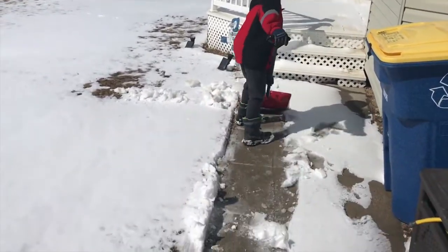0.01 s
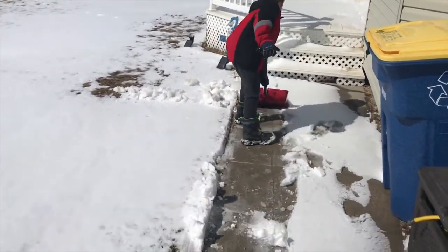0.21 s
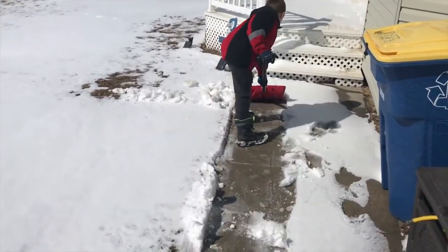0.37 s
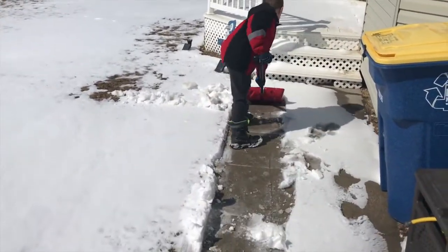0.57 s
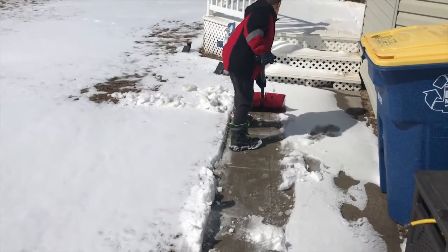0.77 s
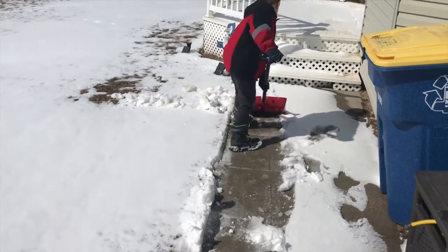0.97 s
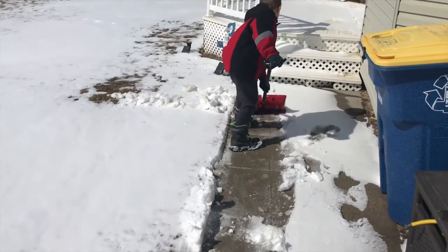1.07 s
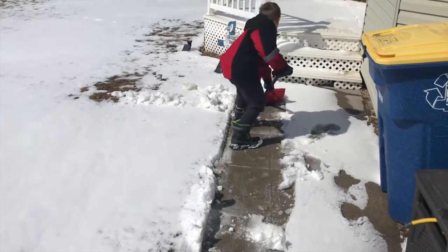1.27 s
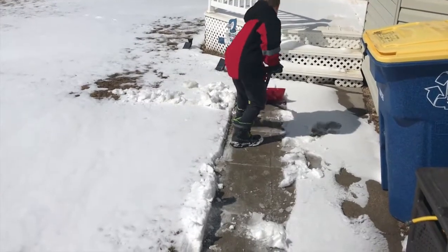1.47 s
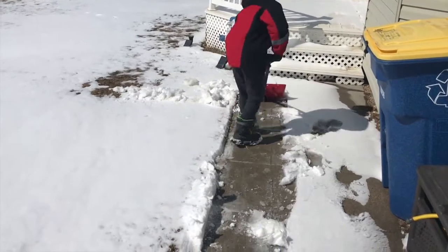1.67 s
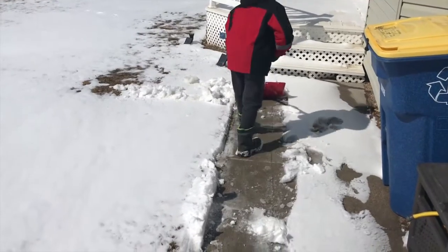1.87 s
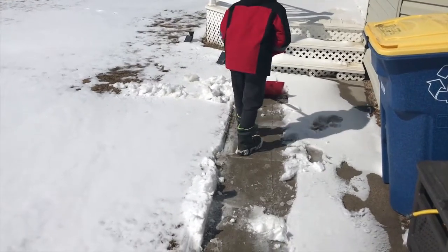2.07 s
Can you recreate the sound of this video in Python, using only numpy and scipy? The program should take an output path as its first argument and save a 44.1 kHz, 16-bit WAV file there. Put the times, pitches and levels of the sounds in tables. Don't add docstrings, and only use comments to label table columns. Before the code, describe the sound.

A plastic snow shovel grates loudly over wet gritty concrete with hollow knocks, drags back lightly with a snap, scrapes again, then fades to faint boot shuffles and low wind thumps on a phone microphone outdoors.

```python
import sys
import numpy as np
from scipy import signal
from scipy.fft import rfft, irfft
from scipy.io import wavfile
from scipy.ndimage import uniform_filter1d

SR = 44100
rng = np.random.default_rng(int(sys.argv[2]) if len(sys.argv) > 2 else 0)


def wav_record(signal):
    frames = np.transpose(np.atleast_2d(signal))
    bounded = np.clip(frames, -1, 1)
    quanta = np.round(bounded * 32767).astype(np.int16)
    wavfile.write(sys.argv[1], SR, quanta)


def to_linear_factor(level_db):
    exponent = np.asarray(level_db, float) / 20
    return 10 ** exponent


N = 94815

# time in seconds, sliding level in dB, load on the blade in dB.
LIFT = [(0, -50.5, 0.5), (.03, -53.5, 3.5), (.085, -58, 4), (.14, -72.5, -20)]
FIRST_PUSH = [(0.155, -49.5, 0), (0.162, -46.5, 0), (.21, -38.5, 0), (0.261, -30.5, 0), (0.302, -38, 0),
              (0.313, -28.5, 0), (0.338, -34.5, 0), (0.353, -30.5, 0), (0.428, -41.5, 0)]
SLIDE_OFF = [(.448, -51.5, -26.5), (.48, -47, -23), (.56, -51, -34), (0.609, -56, -17), (.72, -54, -2)]
DRAG_BACK = [(0.761, -46.5, 2), (.79, -50.5, 3), (0.838, -47, 0), (0.874, -51.5, -5.5), (0.9, -43.5, 2),
             (0.926, -59, 6.5), (0.942, -42.5, 4.5), (1.013, -49.5, 0), (1.074, -72, -2)]
SECOND_PUSH = [(1.09, -48.5, -0.5), (1.108, -48, 0), (1.127, -33, 5), (1.147, -32.5, -4.5),
               (1.16, -38.5, 5.5), (1.222, -37.5, -1.5), (1.233, -30.5, -3), (1.267, -46.5, -1),
               (1.324, -41.5, -1)]
BOOT_STEPS = [
    [(1.35, -56, -8.5), (1.39, -59.5, -23), (1.5, -54, -13), (1.58, -60.5, -10), (1.63, -53.5, -26),
     (1.672, -63, -24), (1.692, -42, -8.5), (1.71, -47.5, -0.5), (1.735, -55, -2)],
    [(1.76, -53.5, -18.5), (1.82, -61.5, -21), (1.85, -68, -22), (1.864, -46.5, -11), (1.885, -46.5, -13),
     (1.905, -47.5, -31), (1.95, -58.5, -4), (2.05, -65.5, 4), (2.15, -56, -4)],
]
# start in seconds, edge level in dB,
# scoop in dB above the edge, crack in dB above the edge, scoop pitch in Hz.
KNOCKS = [(0.028, -50, -22, 6, 338), (0.177, -32, -7, 0, 282), (.209, -20, -9.5, -20, 400),
          (0.233, -21.5, -2.5, -29, 305), (0.2503, -12, -0.5, -1.5, 275), (0.268, -18, -9.5, -32.5, 316),
          (.278, -21.5, 4.5, -20, 237), (0.3178, -11, 0, -25, 350), (.354, -19, 0, -9, 300),
          (0.487, -47, 10.5, 2, 285), (0.764, -29, -2.5, -14, 423), (0.895, -37, 0, -16, 350),
          (0.946, -21, -12.5, -18, 360), (1.001, -27, -2.5, -3, 341), (1.120, -21.5, 4, -15, 363),
          (1.133, -15, -10, -28, 364), (1.146, -15, 7, -30, 315), (1.1676, -20.5, -18, -4.5, 340),
          (1.198, -23, -2, -7, 378), (1.225, -26, -1, -23, 400), (1.298, -30, -6, -10, 361),
          (1.604, -43, -4, 0, 250)]
# frequency in Hz, level in dB, t60 in seconds.
SCOOP_MODES = [(250, -6, 0.087), (326, -0.5, 0.073), (400, 7, 0.024)]
EDGE_MODES = [(519, -9.5, 0.088), (606.7, 1, 0.068), (716.5, 1, 0.054), (902, -3, 0.081),
              (990.6, -2, 0.088), (1100, -0.5, 0.038), (1361, 1, 0.034), (1588, -1, 0.048),
              (1846, 4, 0.014), (1937, 4, 0.013), (2350, -10.5, 0.053), (3402, -10, 0.029)]
# frequency in Hz, level in dB per Hz.
SLUSH_SPECTRUM = [(300, -37), (700, -6), (1500, -2.5), (2200, -3.5), (4000, -12), (8000, -14), (16000, -21)]
# start in seconds, peak in dB, frequency in Hz, fade in seconds.
PUFFS = [(0.014, -42, 60.6, 0.025), (0.081, -36.5, 61, 0.019), (0.732, -38, 58, 0.011),
         (0.799, -28, 105, 0.0094), (0.814, -30, 54, 0.013), (0.889, -27, 76, 0.016),
         (1.019, -37.5, 76.5, 0.028), (1.326, -31, 71, 0.0085), (1.353, -28, 67.4, 0.023),
         (1.585, -30, 71.6, 0.043), (1.6, -24, 102, 0.01), (1.685, -35, 69, 0.02), (1.726, -32, 69.6, 0.03),
         (1.752, -31, 55, 0.013), (1.783, -38, 70, 0.025), (1.815, -20.5, 72.6, 0.014),
         (1.828, -19.5, 61, 0.034), (1.924, -28.5, 76.6, 0.0097), (2.031, -56, 72.4, .013),
         (2.094, -29, 57, 0.024)]
# frequency in Hz, level in dB per Hz.
WIND_SPECTRUM = [(20, -40), (50, 7), (80, -12), (150, -9), (250, -22), (600, -51)]
FLOOR_SPECTRUM = [(150, -3.5), (400, 5.5), (1700, -5.5), (2600, -23), (6000, -21.5), (16000, -30)]
# frequency in Hz, level in dB, t60 in seconds.
JOINT_MODES = [(996, 2, 0.035), (1330, -4, 0.024), (1540, -7.5, 0.029), (2055, 1.5, 0.027),
               (2440, -11, 0.019), (2970, -7, 0.02), (3600, -15.5, .01), (6930, -2, 0.0038)]
# centre in seconds, half-length in seconds, level in dB, frequency in Hz, t60 in seconds.
RUBS = [
    (0.474, 0.016, -47.5, 1930, 0.0074),
    (0.835, .06, -62, 12800, .002),
    (.905, 0.023, -64, 6750, .003),
    (1.6, 0.081, -60, 12400, 0.00074),
    (1.83, 0.024, -57.5, 12900, 0.00045),
    (1.986, 0.01, -59, 3330, 0.0029),
    (2.137, 0.024, -62, 3350, 0.0037),
]
# frequency in Hz, level in dB.
MIC_RESPONSE = [(2200, -1.5), (2700, -2.5), (3500, 3), (5000, 0.5), (6300, 3.5), (9000, 1), (12500, 4.5),
                (15000, 1.5)]
# start in seconds, peak in dB, frequency in Hz, fade in seconds.
PEBBLES = [(.161, -36, 990, 0.003), (.166, -42, 1320, .004), (.178, -33, 1620, .004),
           (.206, -25.5, 1647, 0.014), (.2105, -35, 4850, 0.0027), (.229, -47, 6300, 0.0025),
           (0.2523, -17, 4430, 0.0014), (.253, -15.5, 2400, 0.0041), (.257, -29, 6500, 0.0036),
           (.269, -20, 1420, 0.0058), (.314, -31, 5330, 0.0051), (.315, -30, 6170, 0.0056),
           (.3175, -19, 688, 0.011), (.317, -20.5, 2044, 0.0066), (.348, -34, 6100, 0.0056),
           (.348, -25, 2260, 0.0047), (.355, -33, 4440, 0.0074), (.369, -28, 2090, 0.0039),
           (.378, -37, 3490, 0.0054), (.386, -43, 650, 0.0064), (.411, -36, 1330, 0.0045),
           (.428, -41, 1010, 0.0055), (.634, -39, 1470, 0.0017), (.969, -26, 1100, .004),
           (.97, -28, 2050, 0.0035), (1.088, -42, 970, 0.0035), (1.1175, -34.5, 3350, .004),
           (1.12, -23, 763, 0.011), (1.1325, -13.5, 1537, 0.0026), (1.1325, -28, 6350, 0.0024),
           (1.175, -41, 730, .012), (1.142, -27, 6020, 0.0043), (1.142, -22.5, 3280, 0.0024),
           (1.143, -12.5, 1775, 0.0028), (1.147, -21, 735, .012), (1.1676, -24.5, 2440, 0.0034),
           (1.1986, -34, 4060, .004), (1.2, -24.5, 2050, 0.0031), (1.203, -37, 6300, 0.0036),
           (1.297, -31, 918, 0.005), (1.299, -35, 1300, 0.0041), (1.605, -36, 1280, 0.0037),
           (1.604, -40, 3220, 0.00094), (.252, -21, 687, .008)]


def level(x, db):
    return x * to_linear_factor(db) / np.sqrt(np.mean(x ** 2))


def through(x, response):
    return signal.fftconvolve(x, response / np.sqrt(np.sum(response ** 2)))[:N]


def colour(x, points):
    p, size = np.array(points, float), 8192
    hz = np.maximum(np.arange(size // 2 + 1) * SR / size, 1)
    log_gain = np.interp(np.log(hz), np.log(p[:, 0]), p[:, 1]) * np.log(10) / 20
    cepstrum = irfft(log_gain)
    cepstrum[1:size // 2] *= 2
    cepstrum[size // 2 + 1:] = 0
    return through(x, irfft(np.exp(rfft(cepstrum))))


def ring(x, modes):
    t = np.arange(SR // 4) / SR
    response = 0
    for k, (hz, db, t60) in enumerate(modes):
        response = response + (-1) ** k * to_linear_factor(db - 60 * t / t60) * np.sin(2 * np.pi * hz * t)
    return through(x, response)


def walk(rate):
    hold = int(SR / rate)
    steps = rng.standard_normal(4000)[:N // hold + 1]
    return uniform_filter1d(np.repeat(steps, hold)[:N], hold // 2)


def pulse(age, rise, fade):
    return (1 - np.exp(-age / rise)) * np.exp(-age / fade)


def distant_floor():
    noise = colour(rng.standard_normal(N), [(60, -39), *FLOOR_SPECTRUM])
    return to_linear_factor(-57.5 + 2 * walk(5.83)) * noise


def blade_edge(x):
    bend = np.clip(walk(25), -1, 1)
    shares = np.sqrt([np.maximum(-bend, 0), 1 - np.abs(bend), np.maximum(bend, 0)])
    out = 0
    for k, share in zip((-1, 0, 1), shares):
        tuning = [1 + 0.03 * k, 1, 1]
        out = out + ring(x * share, np.array(EDGE_MODES) * tuning)
    return out


def scrape(t):
    grit_per_s, grit_spread_db, judder_db, judder_per_s = 3000, 2, 2.5, 60
    rows = np.vstack([LIFT, FIRST_PUSH, SLIDE_OFF, DRAG_BACK, SECOND_PUSH, *BOOT_STEPS])
    slide = to_linear_factor(np.interp(t, rows[:, 0], rows[:, 1]))
    load = to_linear_factor(np.interp(t, rows[:, 0], rows[:, 2]))
    struck = rng.random(N) < grit_per_s / SR
    size = to_linear_factor(grit_spread_db * np.minimum(rng.exponential(size=N), 4.5))
    ticks = level(struck * size * np.sign(rng.standard_normal(N)), 0)
    grit = ticks * slide * to_linear_factor(judder_db * walk(judder_per_s))
    slosh = rng.standard_normal(N) * slide * to_linear_factor(2.34 * walk(90))
    hiss = colour(0.42 * grit + 0.8 * slosh, SLUSH_SPECTRUM)
    scoop = ring(grit * load ** 2, SCOOP_MODES)
    return hiss + to_linear_factor(-1.5) * blade_edge(grit * load) + to_linear_factor(-4) * scoop


def wind(t):
    start, peak_db, hz, fade = np.array(PUFFS, float).T[:, :, None]
    age = np.maximum(t - start, 0) / fade
    env = 1.24 * (1 - np.exp(-age / 0.39)) * np.exp(-age ** 1.8 / 1.2)
    cycles = hz * fade * age * (1 + 0.13 * np.exp(-age))
    puffs = (to_linear_factor(peak_db) * env * np.cos(2 * np.pi * cycles)).sum(0)
    gust_db = np.interp(t, [0, 1.3, 1.8, 2.15], [-6.5, -1, 16.0, 1.5]) + 3 * walk(20.88)
    return puffs + to_linear_factor(-54 + gust_db) * colour(rng.standard_normal(N), WIND_SPECTRUM)


def knocks(t):
    start, edge_db, scoop_db, crack_db, scoop_hz = np.array(KNOCKS, float).T[:, :, None]
    age = np.maximum(t - start, 0)
    env = pulse(age, 0.00045, 0.004) * to_linear_factor(edge_db)
    chatter, crackle = rng.standard_normal((2, N))
    blow = env * (chatter + 2.2 * (age / 0.0003 < 1))
    boom = to_linear_factor(edge_db + scoop_db) * pulse(age, 0.0022, 0.0057) * np.sin(2 * np.pi * scoop_hz * age)
    band = signal.butter(1, [2500, 11000], "band", fs=SR, output="sos")
    crack = signal.sosfilt(band, crackle * (env * to_linear_factor(crack_db)).sum(0))
    return to_linear_factor(-3.0) * blade_edge(blow.sum(0)) + to_linear_factor(4.5) * boom.sum(0) + to_linear_factor(-5) * crack


def pebbles(t):
    start, peak_db, hz, fade = np.array(PEBBLES, float).T[:, :, None]
    age = np.maximum(t - start, 0)
    env = to_linear_factor(peak_db) * pulse(age, 0.0006, fade)
    wander = np.array([walk(700) for _ in PEBBLES])
    rough = 0.6 * np.minimum(hz / 3000, 1) * wander
    return (env * np.sin(2 * np.pi * hz * age + rough)).sum(0)


def rubs(t):
    out = 0
    for centre, half, db, hz, t60 in RUBS:
        swell = to_linear_factor(db) * np.exp(-((t - centre) / half) ** 2)
        out = out + ring(rng.standard_normal(N) * swell, [(hz, 0, t60)])
    return out


def handle_snap(t):
    age = np.maximum(t - 0.936, 0)
    blow = rng.standard_normal(N) + 0.88 * (age / 0.0003 < 1)
    snap = pulse(age, 0.00061, 0.0017) * blow * to_linear_factor(-5)
    return ring(snap, JOINT_MODES) + to_linear_factor(-22) * np.gradient(snap)


def yard_echo(shovel, t):
    t60_s, tail_t = 0.095, t[:SR // 3]
    tail = rng.standard_normal(SR // 3) * to_linear_factor(-60 * tail_t / t60_s) * (tail_t > 0.006)
    return to_linear_factor(-12.5) * through(shovel, tail)


def scene():
    t = np.arange(N) / SR
    shovel = scrape(t) + knocks(t) + pebbles(t) + rubs(t) + handle_snap(t)
    return (distant_floor() + shovel + yard_echo(shovel, t) + wind(t))[None]


def band_limit(x):
    return signal.sosfilt(signal.butter(12, 16810, fs=SR, output="sos"), x)


def record(dry):
    dip_hz, dip_width_hz, dip_share, top_hz = 10500, 1000, 0.54, 15720
    port = colour(dry[0], MIC_RESPONSE)
    b, a = signal.iirpeak(dip_hz, dip_hz / dip_width_hz, fs=SR)
    port = port - dip_share * signal.lfilter(b, a, port)
    top_cut = signal.ellip(12, 0.2, 70, top_hz, fs=SR, output="sos")
    mix = signal.sosfilt(top_cut, port)[None]
    return band_limit(mix)


dry = scene()
out = record(dry)
wav_record(out)
```